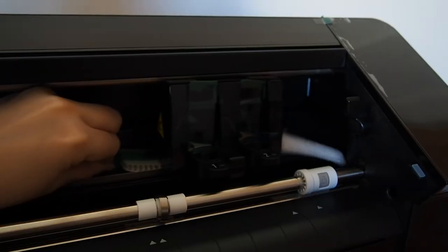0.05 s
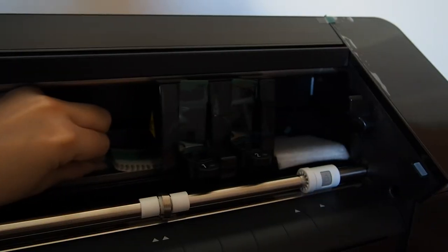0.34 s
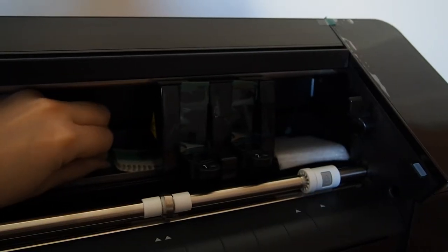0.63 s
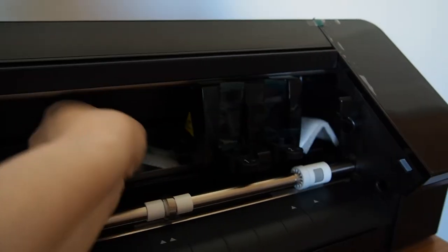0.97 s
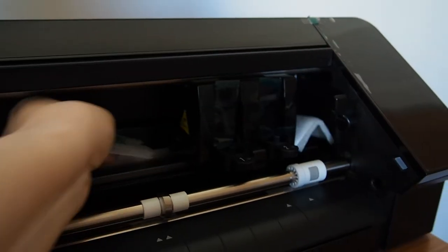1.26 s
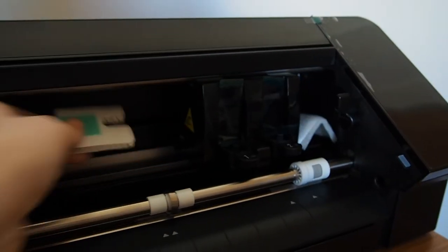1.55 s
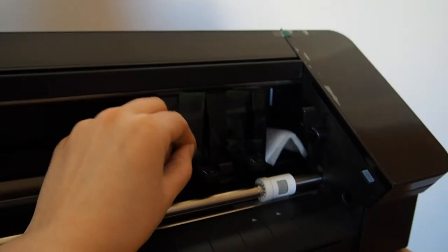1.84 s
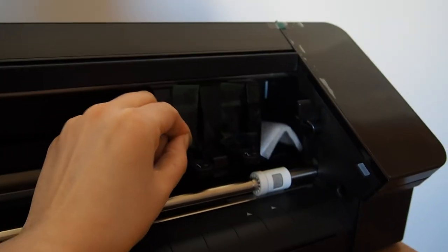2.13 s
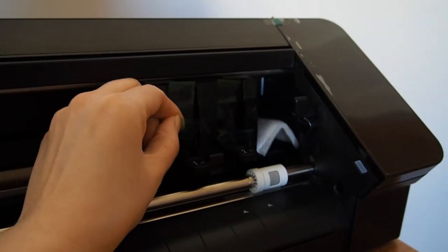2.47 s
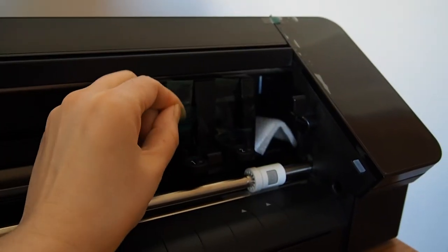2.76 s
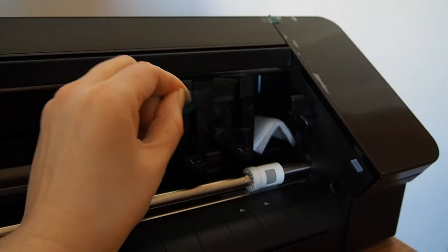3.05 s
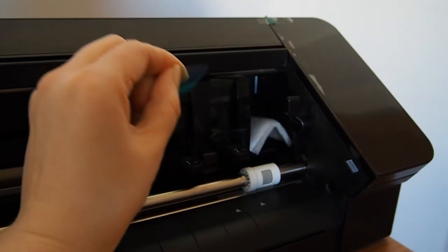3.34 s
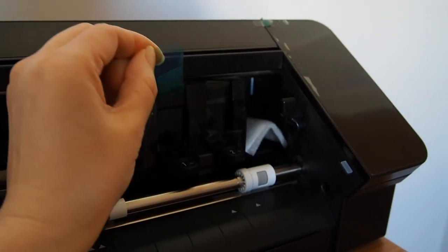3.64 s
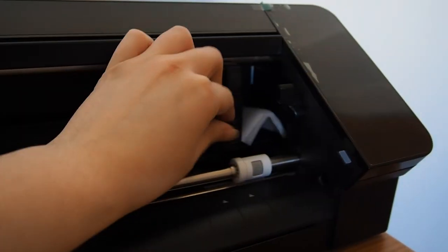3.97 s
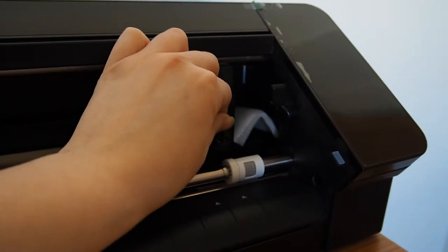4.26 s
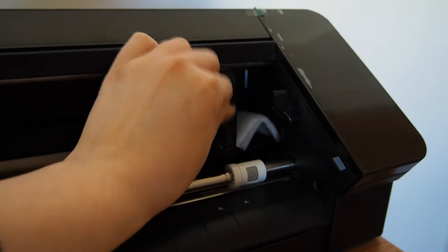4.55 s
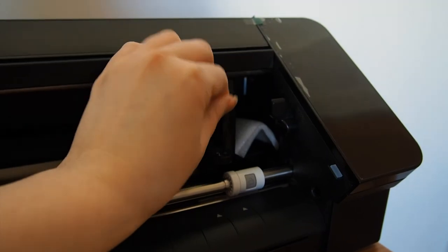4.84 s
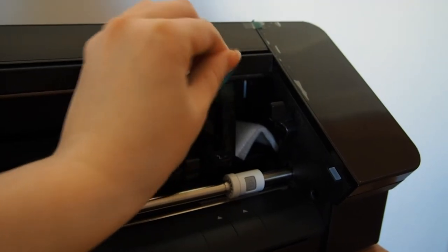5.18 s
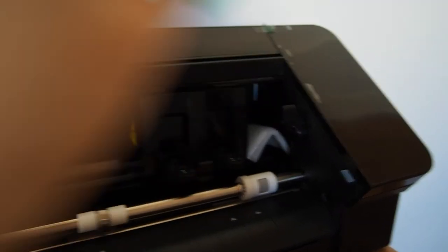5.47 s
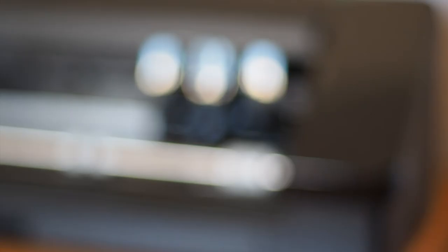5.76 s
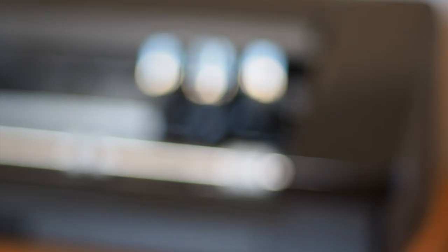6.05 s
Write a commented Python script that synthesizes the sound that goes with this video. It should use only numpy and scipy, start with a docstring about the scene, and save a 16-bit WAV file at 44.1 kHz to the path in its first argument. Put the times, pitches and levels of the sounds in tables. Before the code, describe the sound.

A printer's carriage rubs briefly along its rail, then packing tape peels off with soft hisses and sharp plastic snaps in a quiet room.

```python
"""A small room, where hands slide a new desktop printer's carriage aside and pull packing tape off its parts.
The carriage rubs along its rail, drags a humming belt and knocks once against the plastic. The tape hisses as
threads of glue part, then lets go in sharp snaps that crack the plastic, shake the hollow case and ring in the
room; fingers and tape ends tick in between. Partway through, the snaps' ringing, echoes and rattle stop dead
while the tape hiss goes on, and the whole sound drops out briefly before it ends on quiet room air."""
import sys
import numpy as np
from scipy import signal
from scipy.fft import rfft, irfft, next_fast_len
from scipy.io import wavfile
from scipy.ndimage import uniform_filter1d, map_coordinates

SR = 44100
rng = np.random.default_rng(int(sys.argv[2]) if len(sys.argv) > 2 else 0)


def unload_wav(signal):
    """Save mono or channel-first audio to the path in sys.argv[1] as 16-bit WAV at rate SR, clipped to [-1, 1]."""
    wavfile.write(
        sys.argv[1],
        SR,
        np.round(np.clip(np.atleast_2d(signal).T, -1, 1) * 32767).astype(np.int16),
    )


N = 273852
TIME = np.arange(N) / SR
CUT_S, DROPOUT_S = 3.844, (5.597, 5.712)   # the snaps' ring, echoes and case rattle stop dead; later all sound drops out


def snaps_and_knocks(stutters=3, stutter_gap_s=0.0078, stutter_slip_s=0.004, mount_hz=758, case_lag_s=0.00255):
    """Tape or a clipped part lets go in two snaps and a dying stutter, and once the carriage knocks the same
    way; lists releases and case jolts."""
    # t/s, ring/dB, ring/Hz, knock/dB, knock/Hz, crack/dB, slip length/s, second snap's delay/s, second snap re
    # first/dB, loss per stutter/dB, case rattle/dB, panel ring/dB, room send/dB; the first row is the carriage
    # knocking
    snaps = [(1.0065, -24, 3990, -27.5, 1480, -19.5, 0.0025, 0.0025, 3, 26, -49, -65, -9.5),
             (2.0823, -14.5, 5720, -41.5, 1530, -19.5, 0.00084, .0095, 0, 33, -48.5, -53, -12),
             (2.3733, -7.5, 7690, -29, 1466, -10.5, 0.00042, .0095, -8.5, 12, -36.5, -45, -13),
             (3.249, -14.5, 4900, -26, 1440, -10.5, 0.0071, .014, 2.5, 7.5, -32, -34.5, -9),
             (3.8024, -21.5, 6050, -35, 1760, -16, 0.0071, 0.0049, 2.5, 6, -38.5, -42, -7.5),
             (3.9088, -22.5, 5320, -28, 1790, -23.5, 0.0017, .0025, -6, 19, -36.5, -51, -10.5),
             (4.5738, -23, 6370, -39.5, 800, -19.5, 0.0033, .0168, 5.5, 13, -29, -34, -10),
             (5.0929, -13.5, 5460, -30, 1370, -11, 0.00027, 0.0034, -1.5, 9, -30.5, -34, -8.5),
             (5.2435, -18.5, 5070, -25.5, 1940, -12, 0.0038, 0.0082, -2, 5.5, -42, -42.5, -9.5)]
    ring_sag = 0.12   # the ring drops by this share with each slip, as the freed strip gets longer
    knock_keep = 0.11   # the knock sinks to the mount's lowest mode; share of the gap left per slip
    rattle_tilt_db, panel_tilt_db = 3, -4.5   # per octave
    releases, jolts = [], []
    for (s, ring_db, ring_hz, knock_db, knock_hz, crack_db, slip_s, delay_s,
         second_db, loss_db, rattle_db, panel_db, room_db) in snaps:
        run = [(s, 0, slip_s), (s + delay_s, second_db, slip_s)]
        for k in range(1, stutters + 1):
            run.append((s + delay_s + k * stutter_gap_s, second_db - k * loss_db, stutter_slip_s))
        for k, (at_s, db, length_s) in enumerate(run):
            sagged_hz = ring_hz * (1 - ring_sag) ** k
            sunk_hz = mount_hz + (knock_hz - mount_hz) * knock_keep ** k
            releases.append((at_s, room_db, ring_db + db, sagged_hz, knock_db + db, sunk_hz,
                             crack_db + db, length_s))
        # the case takes the blow just after a point between the two snaps, nearer the stronger one
        jolt_s = s + case_lag_s + delay_s / (1 + from_db(-2 * second_db))
        jolts.append((jolt_s, rattle_db, rattle_tilt_db, panel_db, panel_tilt_db))
    return releases, jolts


def finger_ticks(typical_slip_s=0.0024, typical_db=-39, room_db=-10.5, tilt_db_per_octave=3):
    """Fingers and tape ends tick on the plastic and nudge the case; lists releases and case jolts."""
    # t/s, ring/dB, ring/Hz, knock/dB, knock/Hz, crack/dB
    ticks = [(0.749, -34.5, 3440, -48.5, 2090, -41), (0.921, -31.5, 9000, -66, 716, -38),
             (0.9426, -45, 2840, -51, 680, -44), (0.971, -56, 3070, -51, 953, -40),
             (0.998, -39, 6070, -42, 1030, -30.5), (1.8597, -47, 6000, -53, 1900, -55),
             (1.8804, -14.5, 5890, -48, 1860, -20), (2.001, -29.5, 5500, -47, 1440, -29.5),
             (2.363, -45.5, 4500, -67.5, 1400, -41.5), (3.87, -36.5, 6700, -36, 760, -44),
             (4.059, -43.5, 3620, -42.5, 696, -60), (4.175, -49.5, 2610, -50, 2070, -64),
             (4.3591, -30, 7540, -48, 920, -29.5), (4.4617, -29, 2900, -39, 696, -23.5),
             (5.2707, -21, 6140, -44, 1500, -18), (5.3605, -27, 5000, -44, 2060, -29.5),
             (5.401, -38.5, 5740, -64, 1960, -38), (5.4435, -33.5, 5360, -48.5, 1525, -39),
             (5.4602, -37.5, 5740, -56.5, 740, -37), (5.586, -46.5, 5500, -60, 650, -72)]
    releases, jolts = [], []
    for s, ring_db, ring_hz, knock_db, knock_hz, crack_db in ticks:
        slip_s = typical_slip_s * from_db(typical_db - ring_db)   # harder ticks slip faster
        releases.append((s, room_db, ring_db, ring_hz, knock_db, knock_hz, crack_db, slip_s))
        rattle_db, panel_db = knock_db - 8, knock_db - 24
        jolts.append((s, rattle_db, tilt_db_per_octave, panel_db, tilt_db_per_octave))
    return releases, jolts


def slips(slip_s, t60, release_db):
    """The force in a snap: one clean release, then a dense run of micro-slips that dies away."""
    t = TIME[:SR // 32]
    force = energy_one(noise(len(t)) * from_db(-60 * np.maximum(t - slip_s, 0) / t60))
    force[:, 0] += from_db(release_db)
    return force


def snap(ring_db, ring_hz, knock_db, knock_hz, crack_db, slip_s, even_db=0, ring_q=4.4, knock_q=12):
    """One release: the ring of the plucked part, a duller knock of its mount and a bright crack."""
    # a short slip is one clean release that rings; a long one is a broad crackle
    release_db = even_db - 10 * np.log10(max(slip_s / 0.00022, 1))
    crackle = slip_s / (slip_s + 0.00094)
    broad_gain = from_db(-1)
    force = slips(slip_s, t60=0.013, release_db=release_db)
    ring = energy_one(resonance(band(force, ring_hz * 0.53, 8600), ring_hz, ring_hz / ring_q))
    ring += broad_gain * crackle * energy_one(band(force, 2400, 6500))
    force = slips(slip_s, t60=0.03, release_db=release_db - 2.5)
    knock = energy_one(resonance(band(force, 770, 2600), knock_hz, knock_hz / knock_q))
    knock += broad_gain * energy_one(band(force, 630, 2400))
    force = slips(slip_s, t60=0.011, release_db=release_db - 12.5)
    crack = band(force, 7200, 14200, order=3)
    layers = [(ring_db, ring), (knock_db, knock), (crack_db, crack)]
    return np.sqrt(0.005 * SR) * sum(from_db(db) * energy_one(layer) for db, layer in layers)


def plastic(x, level_db=1):
    """The small plastic parts colour each snap with their sharp resonances."""
    # f/Hz, width/Hz, level/dB
    modes = [(754, 37, -9), (1420, 37, 2), (3063, 82, 4), (4030, 140, -5.5), (4510, 170, -3),
             (5620, 90, -4.5), (5910, 150, -3.5), (7850, 45, -7.5)]
    return from_db(level_db) * (x + resonances(x, modes))


def case_jolt(rattle_db, rattle_tilt_db, panel_db, panel_tilt_db, rise_s=0.0027, rattle_t60=0.43):
    """The hollow case takes up a blow over a few ms: a dense rattle of modes and clear panel tones."""
    # spectrum of the rattle before its tilt: f/Hz, level/dB
    rattle_spectrum = [(55, -12), (90, -6.5), (150, -7.5), (260, -3.5), (340, -10), (450, -1.5),
                       (800, -7.5), (1150, -10), (1500, -19.5), (2200, -19.5), (4000, -25.5), (9000, -57.5)]
    # panel modes: f/Hz, level/dB, t60/s
    panels = [(259, -10.5, 0.2), (423.5, 3.5, 0.24), (458, -3.5, .25), (715, 4.5, 0.27), (954, -9, 0.35),
              (1375, -16, .22), (1483, -8.5, 0.32), (1940, -16.5, 0.27)]
    t = TIME[:SR // 2]
    tilted = [(hz, db + rattle_tilt_db * np.log2(hz)) for hz, db in rattle_spectrum]
    rattle = noise(len(t), tilted) * from_db(rattle_db - 60 * t / rattle_t60)
    tones = 0
    for (hz, db, t60), (scatter_db, phase) in zip(panels, rng.standard_normal((len(panels), 2))):
        tilt_db = panel_tilt_db * np.log2(hz / 500)   # a soft blow favours the low panels
        level_db = panel_db + db + tilt_db + scatter_db
        tones = tones + from_db(level_db - 60 * t / t60) * np.sin(2 * np.pi * (hz * t + phase))
    return (rattle + tones) * (1 - np.exp(-t / rise_s))


def handling(start_s, end_s, room):
    """Snaps and ticks between two times, with their case jolts and echoes, all cut dead at the end."""
    direct, send, case, out = np.zeros((4, 2, N))
    snap_releases, snap_jolts = snaps_and_knocks()
    tick_releases, tick_jolts = finger_ticks()
    for s, room_db, *click in snap_releases + tick_releases:
        if start_s <= s < end_s:
            add(direct, s, snap(*click))
            # the room gathers what goes out in all directions, which evens out the colour
            all_round = snap(*click, even_db=16)
            add(send, s, all_round[:1] * from_db(room_db))
    for s, *blow in snap_jolts + tick_jolts:
        if start_s <= s < end_s:
            add(case, s, case_jolt(*blow))
    first, last = round(start_s * SR), round(end_s * SR)
    echoes = signal.oaconvolve(send[:, first:last], room, axes=1)[:, :last - first]
    out[:, first:last] = plastic(direct[:, first:last] + echoes + 1e-18) + case[:, first:last]
    return out


def peeling(hiss_db=-2, strip_db=-5, flutter_db=2.1, rustle_db=-62.5, rustle_s=(1.38, 4.9)):
    """Threads of glue part in a grainy hiss that rings the taut strip and swells as each pull tightens."""
    # pulls on the tape: t/s, length/s, final level/dB, swell/dB
    pulls = [(0.78, .045, -46.5, 1), (2.306, 0.093, -30, 18.5), (2.597, 0.35, -41, 12),
             (3.112, 0.15, -49.5, 7), (3.745, 0.053, -41.5, 12), (3.989, 0.048, -45, 7),
             (4.367, 0.27, -52.5, 1.5), (4.782, 0.19, -42, 4), (5.032, 0.36, -43.5, 5),
             (5.445, 0.11, -52.5, 4.5)]
    # spectrum of the hiss: f/Hz, level/dB
    hiss_spectrum = [(100, -21.5), (400, -7), (1000, 2), (1500, -3), (2000, -8), (3700, -5.5), (7000, -8),
                     (8500, 1.5), (13000, 2.5), (16000, -10), (18000, -41)]
    # resonances of the taut strip: f/Hz, width/Hz, level/dB
    strip_modes = [(4820, 460, -6.5), (5440, 810, 2.9)]
    hand = dict(attack_s=0.041, release_db_per_s=190.5)
    creep = from_db(rustle_db) * stroke(rustle_s[0], rustle_s[1] - rustle_s[0], **hand)
    for s, length_s, final_db, swell_db in pulls:
        tension = np.clip((TIME - s) / length_s, 0, 1) ** 4.2   # builds late in the pull
        creep += from_db(final_db - swell_db * (1 - tension)) * stroke(s, length_s, **hand)
    threads = noise(N, hiss_spectrum, diffuse=0.034) * from_db(drift(420))
    strip = rms_one(resonances(threads, strip_modes))
    flutter = from_db(flutter_db * drift(45))
    return (from_db(hiss_db) * threads + from_db(strip_db) * strip) * creep * flutter


def carriage(rub_db=-0.5, rail_db=-3, rough_db=0.5, squeak_hz=2590, squeak_width_hz=28):
    """The sliding carriage's friction rings the rail, and one of its resonances squeaks faintly."""
    # pushes along the rail: t/s, length/s, friction/dB, squeak/dB
    pushes = [(-.04, .37, -44.5, -58), (0.776, 0.059, -51, -51), (0.922, 0.09, -50, -62),
              (1.153, 0.097, -54, -60), (1.257, 0.15, -51, -64), (1.432, 0.09, -59, -54)]
    # resonances of carriage and rail: f/Hz, width/Hz, level/dB
    rail_modes = [(525, 180, -9), (1000, 150, 1.5), (1394, 47, 1), (1840, 230, -3.5), (2600, 120, 1),
                  (2890, 101, -4), (3100, 82, -3), (4620, 190, 2), (5300, 240, 2.5)]
    # spectrum of the rubbing: f/Hz, level/dB
    rub_spectrum = [(150, -40), (250, -34), (501, 1), (845, -11), (2320, -13.5), (2570, -6), (4190, -8.5),
                    (5440, -13), (6470, -14.5), (8400, -12.5), (10500, -12), (13000, -11.5), (16000, -25)]
    rub_gain = squeak_gain = 0
    for s, length_s, friction_db, squeak_db in pushes:
        push = stroke(s, length_s, attack_s=0.035, release_db_per_s=233)
        rub_gain += push * from_db(friction_db)
        squeak_gain += push ** 2 * from_db(squeak_db)
    rail = rms_one(resonances(noise(N), rail_modes))
    rub = from_db(rub_db) * noise(N, rub_spectrum) + from_db(rail_db) * rail
    squeak = rms_one(resonance(noise(N), squeak_hz, squeak_width_hz))
    return rub * rub_gain * from_db(rough_db * drift(66.9)) + squeak * squeak_gain


def belt(gear_hz=81, gear_db=-66, rumble_db=-61, wobble_db=1.9, stop_s=0.68, release_db_per_s=130):
    """The dragged belt drive hums unsteadily over a low gear tone and a rough rumble."""
    # the hum as the carriage is pushed: t/s, f/Hz, level/dB
    hum_curve = [(0.0, 186, -43), (0.144, 189.3, -44), (0.196, 187.2, -54), (0.366, 186.7, -63),
                 (0.418, 188.6, -57), (0.584, 183.2, -57), (0.636, 196, -62), (0.698, 172, -70),
                 (0.74, 179, -66)]
    def wavering_tone(hz):
        return np.sqrt(2) * np.sin(2 * np.pi * np.cumsum(hz * (1 + 0.026 * drift(40))) / SR)
    hum_hz, hum_db = in_time(hum_curve)
    rumble = from_db(rumble_db) * rms_one(band(noise(N), 140, 227))
    gear = from_db(gear_db + wobble_db * drift(29)) * wavering_tone(gear_hz)
    hum = wavering_tone(hum_hz) * from_db(hum_db + wobble_db * drift(34.6))
    rolling = from_db(-release_db_per_s * np.clip(TIME - stop_s, 0, 1))
    return rolling * (hum + gear + rumble)


def room_response(bay_db=-6, bay_t60=0.12, predelay_s=0.002, wall_s=0.0041, wall_db=-10):
    """Quick echoes in the printer's bay, one near reflection and the tail of the room."""
    # decay of the room: f/Hz, t60/s
    room_t60 = [(200, 0.25), (1000, 0.36), (4000, 0.31), (9000, 0.31), (16000, 0.35)]
    t = TIME[:SR // 2]
    edges_hz = np.geomspace(150, 19000, 9)
    tail = 0
    for low, high in zip(edges_hz, edges_hz[1:]):
        t60 = at_hz(room_t60, np.sqrt(low * high))
        tail += band(noise(len(t)), low, high) * from_db(-60 * t / t60)
    bay = noise(len(t)) * from_db(-60 * t / bay_t60)
    arrived = t > predelay_s
    response = energy_one(tail * arrived) + from_db(bay_db) * energy_one(bay * arrived)
    response[:, round(wall_s * SR)] += from_db(wall_db)
    return response


def room_air(level_db=-53):
    """A quiet, steady bed of air from all sides."""
    # spectrum of the air: f/Hz, level/dB
    air_spectrum = [(18, -53), (30, -14.5), (53, -15.5), (145, -11.5), (184, -7.5), (259, -9.5), (394, -12),
                    (449, -5), (584, -9.5), (1130, -11.5), (2230, -18), (2830, -16), (10800, -20.5),
                    (14400, -22.5), (16000, -28)]
    return from_db(level_db) * noise(N, air_spectrum, diffuse=0.55)


def noise(size, spectrum=None, diffuse=0.0):
    """Stereo noise at rms 1, narrow in the bass and wide in the treble; diffuse widens it further."""
    # stereo image: f/Hz, left-right likeness/0-1
    likeness = [(100, 1), (600, 0.95), (1200, 0.7), (2500, 0.7), (5000, 0.22), (8000, 0.1), (14000, 0.43)]
    length = next_fast_len(size)
    hz = np.fft.rfftfreq(length, 1 / SR)
    mid, side = rfft(rng.standard_normal((2, length)))
    alike = np.clip(at_hz(likeness, hz) - diffuse, 0, 0.99)
    pair = np.sqrt(1 + alike) * mid + np.sqrt(1 - alike) * side * [[1], [-1]]
    if spectrum is not None:
        pair = pair * from_db(at_hz(spectrum, hz))
    return rms_one(irfft(pair, length)[:, :size])


def stroke(start_s, length_s, attack_s, release_db_per_s):
    """Envelope of one hand movement: attack, hold, release."""
    attack = np.clip((TIME - start_s) / attack_s, 0, 1)
    return attack * from_db(-release_db_per_s * np.clip(TIME - start_s - length_s, 0, 1))


def drift(rate_hz):
    """Glide between random values of spread 1, rate_hz of them a second."""
    knots = rng.standard_normal(4000)
    return np.interp(TIME * rate_hz, np.arange(len(knots)), knots)


def resonance(x, hz, width_hz):
    """Two-pole resonance with gain 1 at its peak."""
    r = np.exp(-np.pi * width_hz / SR)
    feedback = [1, -2 * r * np.cos(2 * np.pi * hz / SR), r * r]
    return signal.lfilter(np.array([1, 0, -1]) * (1 - r * r) / 2, feedback, x)


def resonances(x, modes):
    """Ring a bank of parallel resonances."""
    return sum(from_db(db) * resonance(x, hz, width_hz) for hz, width_hz, db in modes)


def band(x, low_hz, high_hz, order=2):
    """Causal band-pass."""
    edges_hz = [low_hz, min(high_hz, SR / 2 - 1000)]
    return signal.sosfilt(signal.butter(order, edges_hz, "band", fs=SR, output="sos"), x)


def from_db(db):
    """Decibels to gain."""
    return 10 ** (np.asarray(db) / 20)


def rms_one(x):
    """Scale to rms 1."""
    return x / np.sqrt(np.mean(x ** 2) + 1e-20)


def energy_one(x):
    """Scale to unit energy, averaged over the channels."""
    return rms_one(x) / np.sqrt(x.shape[-1])


def in_time(rows):
    """Read a table's curves at every sample."""
    s, *columns = np.transpose(rows)
    return [np.interp(TIME, s, c) for c in columns]


def at_hz(points, hz):
    """Read a table on a log-frequency axis."""
    f, value = np.transpose(points)
    return np.interp(np.log(np.maximum(hz, 1)), np.log(f), value)


def add(out, s, sound):
    """Mix a sound in at time s."""
    i = round(s * SR)
    out[:, i:i + sound.shape[1]] += sound[:, :N - i]


def scene(pan_db=0.52, right_lag_s=0.000011):
    """Snaps, carriage and tape, slightly to the left, over the air of the room."""
    room = room_response()
    snaps = handling(0, CUT_S, room) + handling(CUT_S, DROPOUT_S[0], room)
    left, right = snaps + carriage() + belt() + peeling()
    right = map_coordinates(right, [(TIME - right_lag_s) * SR], order=3, mode="nearest")
    printer = np.array([left * from_db(pan_db), right * from_db(-pan_db)])
    return printer + room_air()


def record(dry, dc_offset=-0.0032, cutoff_hz=15750):
    """The microphone's treble dips, clipping at full scale, a small offset, the dropout and a top cut."""
    # dips in the microphone's response: f/Hz, width/Hz, left depth/0-1, right depth/0-1
    mic_dips = [(6576, 700, .78, 0.6), (10350, 2200, 1, 0.6), (12400, 7000, 0.32, 0.47)]
    x = dry
    for hz, width_hz, left, right in mic_dips:
        x = x - np.array([[left], [right]]) * resonance(x, hz, width_hz)
    audible = (TIME < DROPOUT_S[0]) | (TIME > DROPOUT_S[1])
    gate = uniform_filter1d(audible.astype(float), size=64)
    x = (np.clip(x, -1, 1) + dc_offset) * gate
    return signal.sosfilt(signal.ellip(10, 0.2, 80, cutoff_hz, fs=SR, output="sos"), x)


dry = scene()
out = record(dry)
unload_wav(out)
```